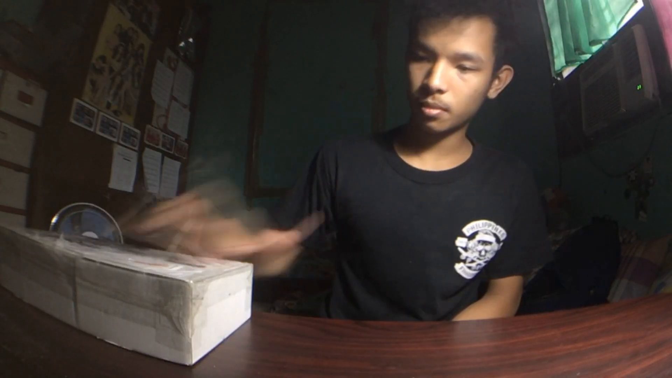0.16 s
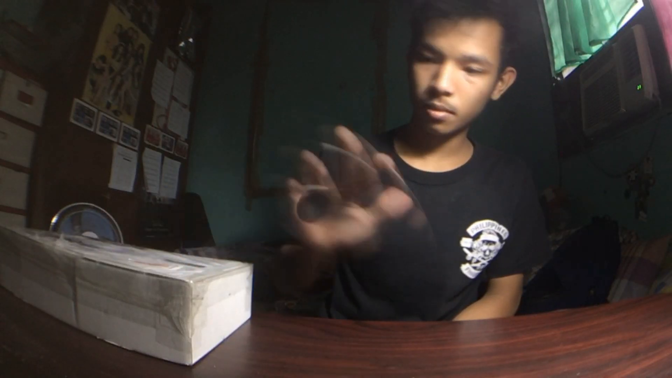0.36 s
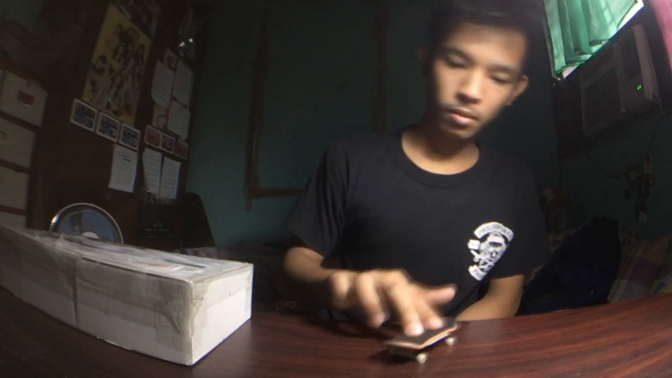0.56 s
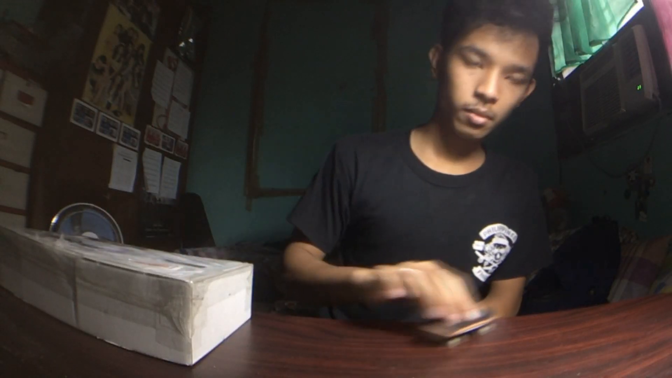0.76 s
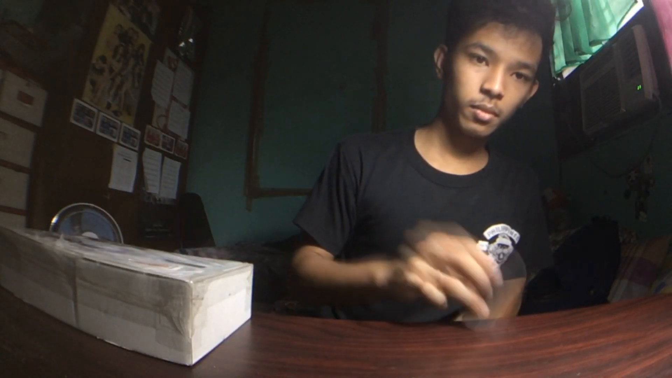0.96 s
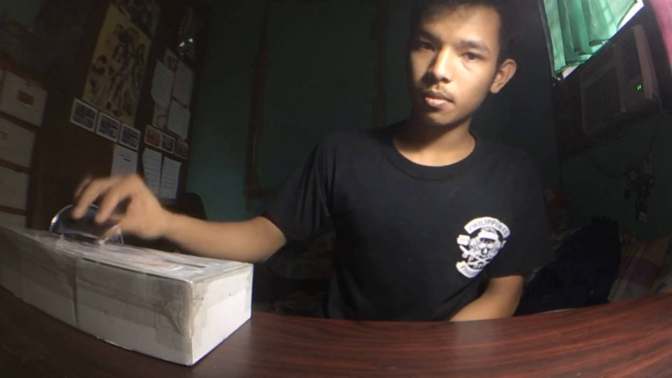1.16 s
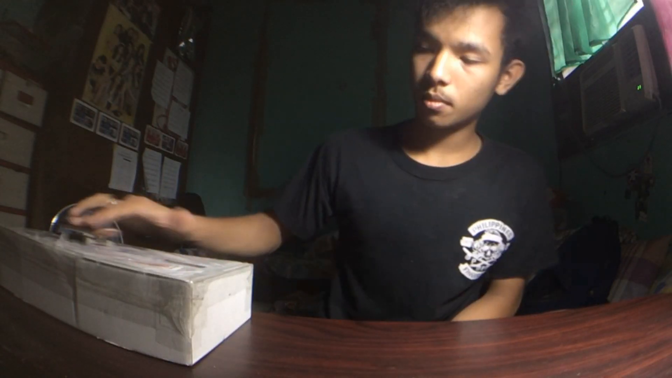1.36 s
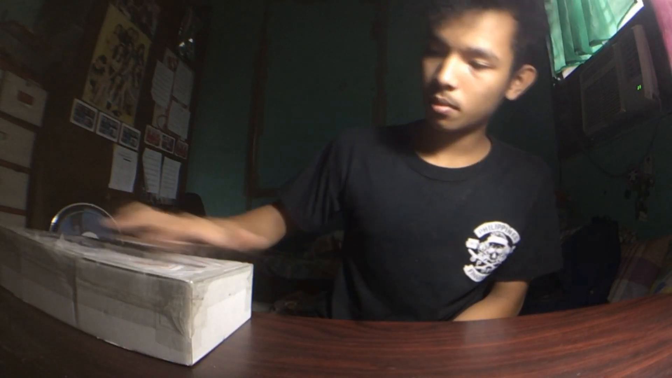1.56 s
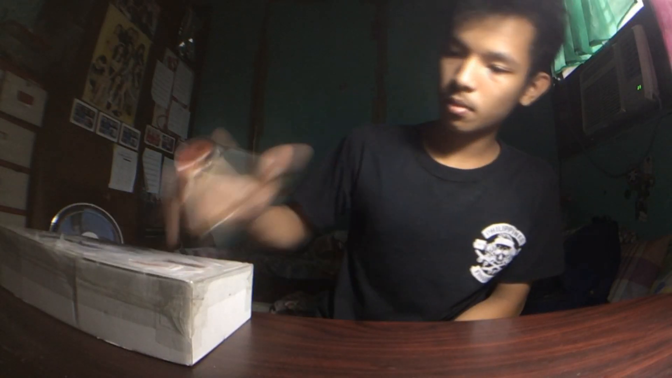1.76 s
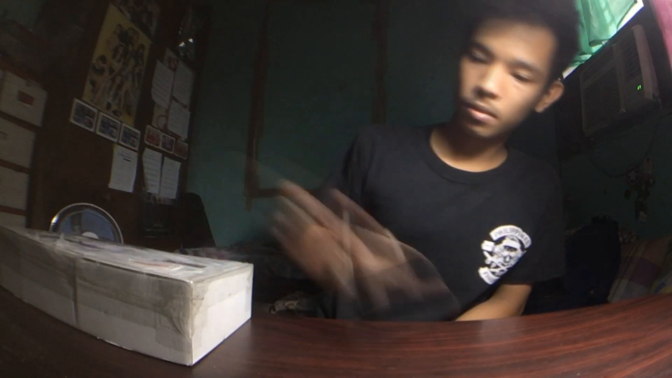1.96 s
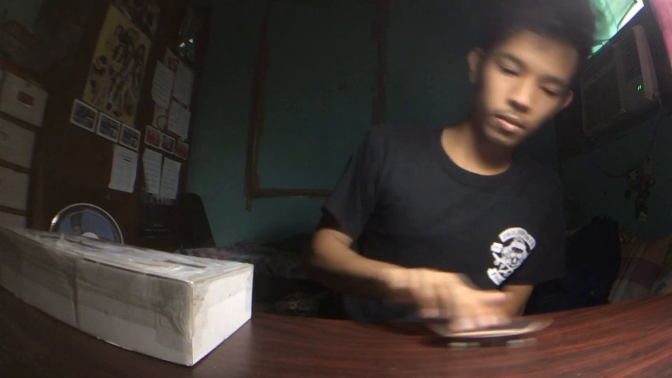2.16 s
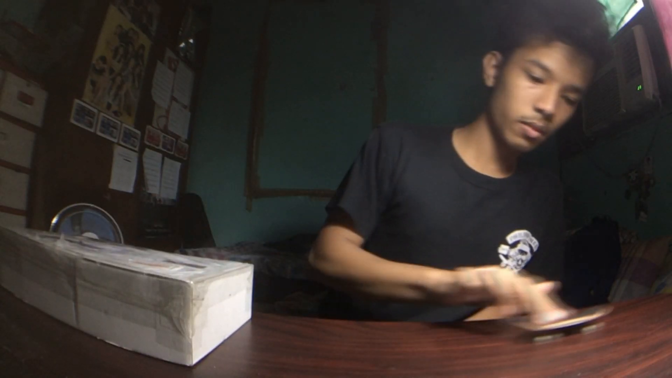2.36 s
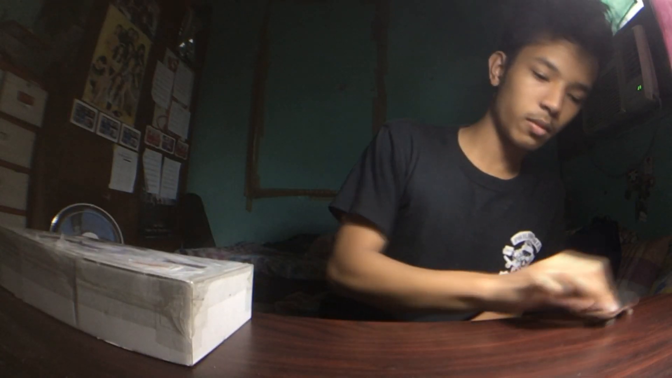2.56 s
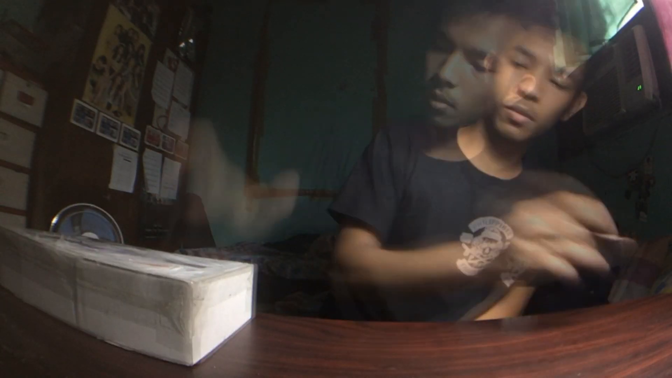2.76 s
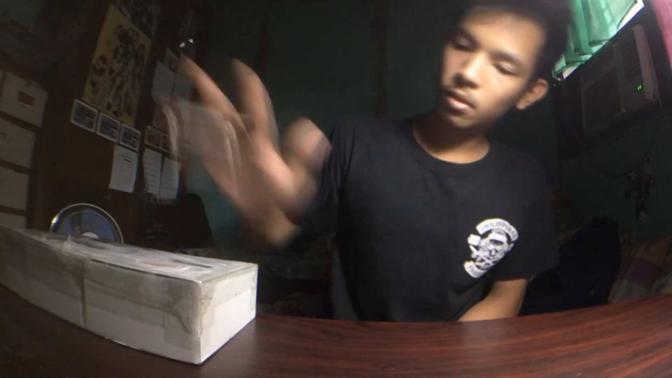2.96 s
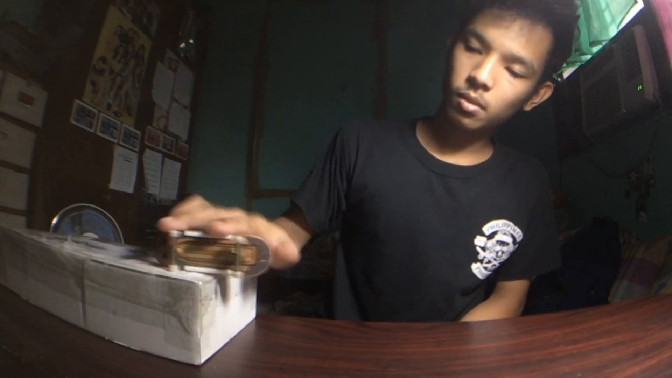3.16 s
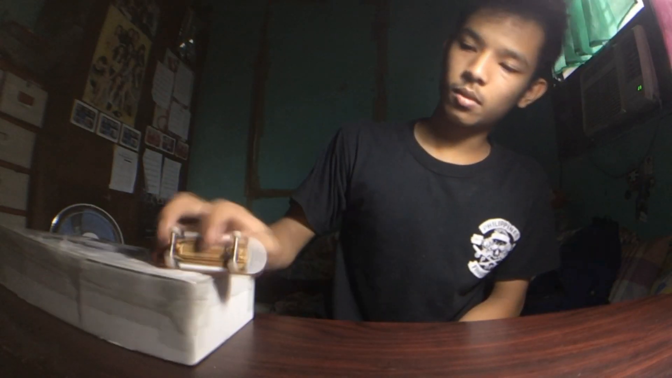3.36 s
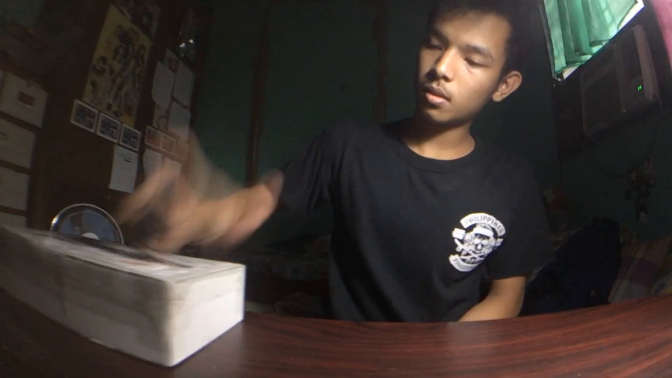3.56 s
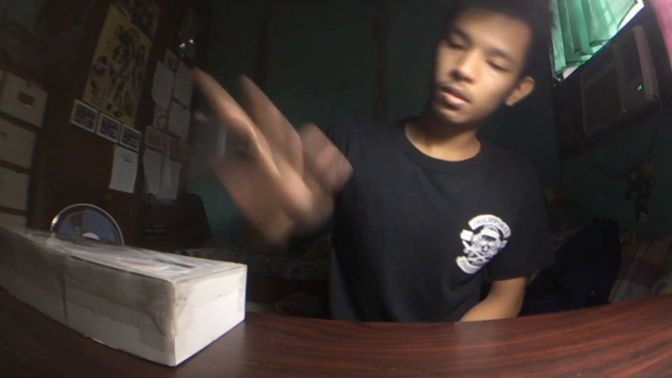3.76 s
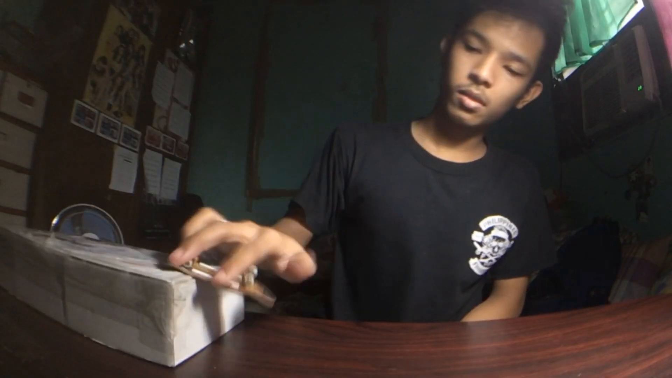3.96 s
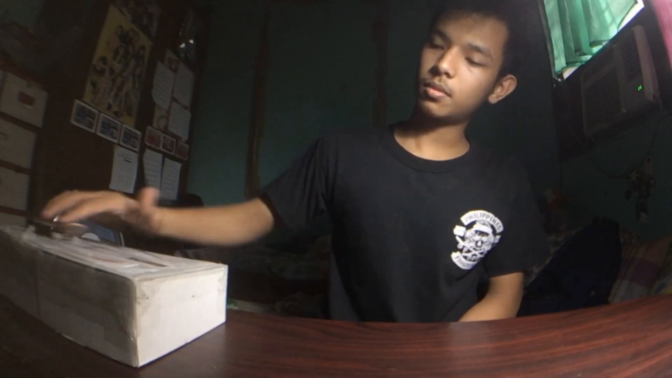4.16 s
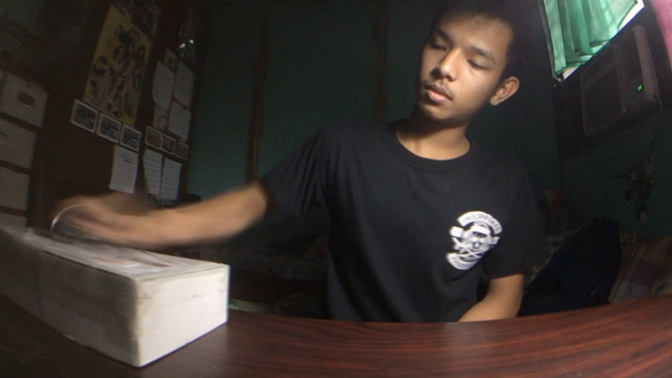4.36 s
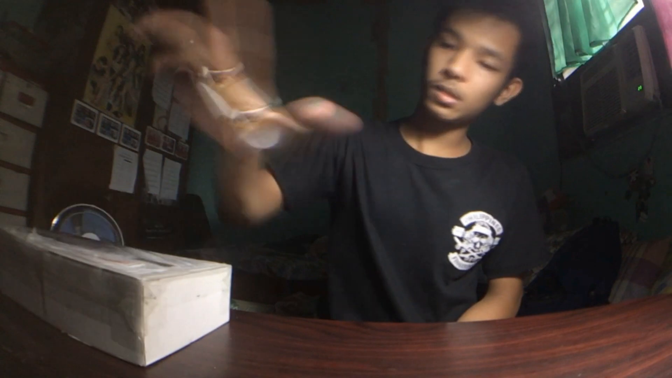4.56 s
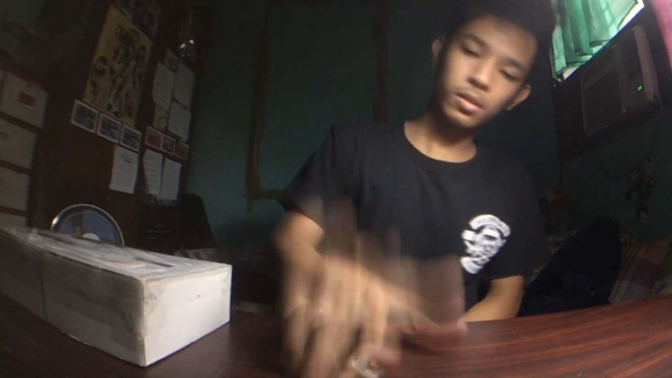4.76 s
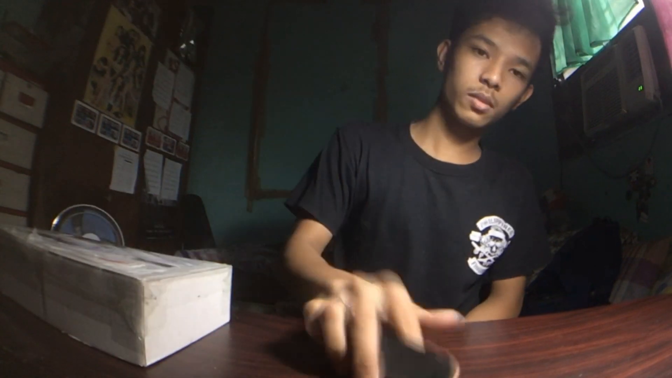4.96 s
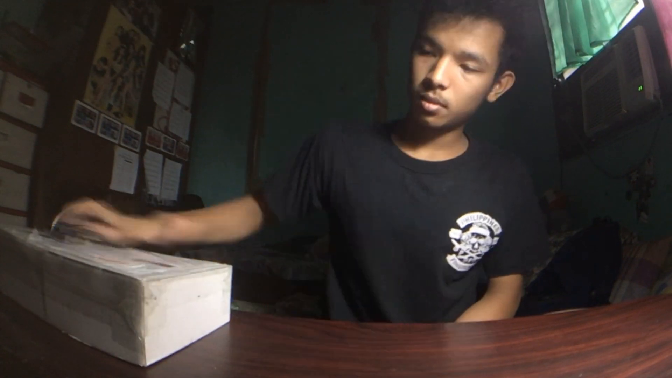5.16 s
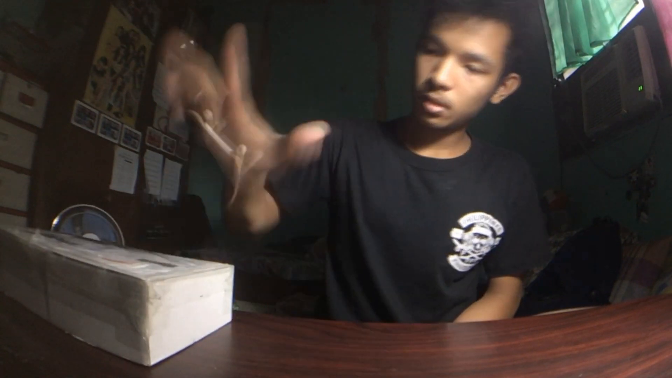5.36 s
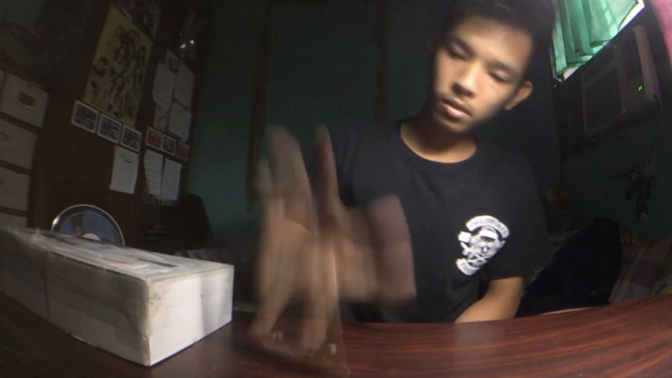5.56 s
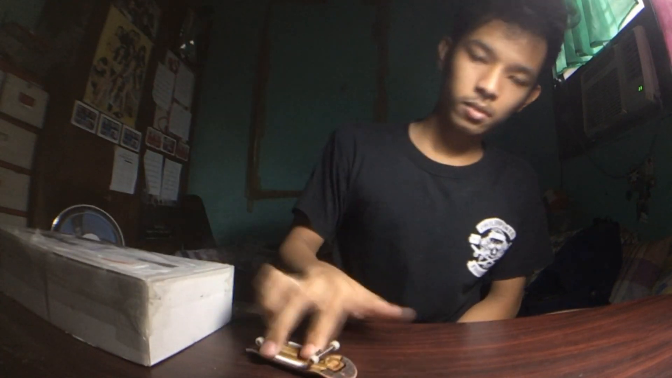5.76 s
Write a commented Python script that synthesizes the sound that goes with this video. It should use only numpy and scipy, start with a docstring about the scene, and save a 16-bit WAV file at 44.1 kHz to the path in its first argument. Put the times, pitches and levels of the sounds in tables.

```python
"""A fan hums in rushing air, then a miniature skateboard whirrs along a box and cracks onto a wooden desk.
Landings and taps excite damped resonances of metal, deck and desk, and each leaves a diffuse room tail.
Rolling is uneven noise jolting the same kinds of resonance; spinning wheels and a squeak are wavering tones.
The fan is a line in narrow noise, the air is shaped noise, and a far engine, heard in two passages, is a
harmonic series. A limiter holds the landings, and the level dips briefly three times."""
import sys
import numpy as np
from scipy import signal
from scipy.fft import rfft, irfft, next_fast_len
from scipy.io import wavfile
from scipy.ndimage import uniform_filter1d, minimum_filter1d, map_coordinates

SR = 44100
rng = np.random.default_rng(int(sys.argv[2]) if len(sys.argv) > 2 else 0)


def ratio(d):
    """dB to gain"""
    e = np.asarray(d, float) / 20
    return 10 ** e


def log_audio(samples):
    """Write samples as a 16-bit WAV file to the path given in sys.argv[1]."""
    # one column per channel
    frames = np.atleast_2d(samples).T
    # limit to full scale, then quantise
    limited = np.clip(frames, -1, 1)
    pcm = np.round(limited * 32767).astype(np.int16)
    wavfile.write(sys.argv[1], SR, pcm)


N = 255780  # samples

# Hard landings of one axle on the desk: start_s, axle_crack_db, wheel_crack_db, wood_db, change_per_skip_db
LANDINGS = [(0.5847, 5.5, 1, 0, 0), (0.6084, 2, -2, -9, 0), (2.1324, -1.5, -22.5, 2, -9.5),
            (2.158, 2, -3.5, -3.5, -1.5), (4.9006, 6, -10, 3.5, 0.5), (5.726, 1, -31.5, 2.5, -10.5)]
# Skips within every landing: delay_s, metal_db, wood_db
SKIPS = [(0, 1, -4), (.0033, -3, 1.5), (.0065, -6, -2), (.013, -8, 1.5)]
# Single taps and knocks: start_s, axle_crack_db, wheel_crack_db, deck_knock_db, desk_body_db
TAPS = [(0.3004, -28, -30, -15.5, -13), (0.616, -20, -25, -13, -4), (1.0833, -17.5, -23.5, -21, -35),
        (1.269, -45, -46, -17.5, -24.5), (1.287, -49, -52, -22, -24), (1.3576, -35, -52, -13.5, -27),
        (1.3678, -30.5, -59, -17.5, -22.5), (1.8435, -16.5, -27, -8.5, -7.5), (2.18, -13, -35, -20, -31),
        (2.704, -28, -34, -39, -38), (2.765, -31.5, -54, -33, -37), (2.91, -57, -44.5, -38, -32),
        (3.19, -12.5, -14.5, -5.5, -9.5), (3.208, -40, -31, -29, -22), (3.2187, -30, -31, -7.5, -9),
        (3.436, -59, -42.5, -51, -34), (3.9625, -15.5, -25, -7, -10.5), (3.98, -30, -48, -40, -16.5),
        (4.02, -21, -26, -41, -32), (4.03, -25, -40, -8.5, -15.5), (4.047, -39, -45, -34, -19.5),
        (4.093, -54, -37.5, -53, -45), (4.9224, -17, -9, -1, -5), (4.972, -16, -29, -18, -17.5),
        (5.704, -33, -56, -31, -38), (5.746, -33, -45, -23, -12)]
# Ticking of a flaw on a wheel: first_s, until_s, axle_crack_db
TICKING = [(0.821, .95, -41.5), (2.413, 2.69, -31.5)]
# Resonances of the axles: pitch_hz, width_hz, level_db
AXLE_MODES = [(2450, 1000, 0), (3650, 900, 0), (4600, 1100, -3)]
# Resonances of the hard wheels and bearings: pitch_hz, width_hz, level_db
WHEEL_MODES = [(5500, 800, -3), (6300, 1100, 0), (7500, 1200, -5), (9700, 2200, -6), (12500, 3000, -16)]
# Resonances of the board: pitch_hz, width_hz, level_db
DECK_MODES = [(644, 120, 1), (846, 60, 2), (1006, 114, 2.5), (1221, 137, 3.5), (1350, 570, -4),
              (1773, 410, -6), (2070, 400, -14.5)]
# Resonances of the desk top: pitch_hz, width_hz, level_db
DESK_MODES = [(160, 78, -5.5), (203.6, 24, 1), (252.4, 18.2, 3.5), (336.8, 28, -2.5), (470, 74, -10.5),
              (238, 280, -11)]
# Resonances of the desk frame: pitch_hz, width_hz, level_db
FRAME_MODES = [(71, 22, -2), (119, 23, 0.5)]
# Resonances of the box: pitch_hz, width_hz, level_db
BOX_MODES = [(574, 243, -8), (870, 128, -5.5), (1050, 156, 1), (1310, 548, -5.5), (1640, 272, -6)]
# Strokes on the desk, rolling wheels and at last a finger scraping: start_s, loudest_s, end_s, rumble_db,
# rattle_db
DESK_STROKES = [(.62, .7, .78, -46, -52), (0.792, 0.846, 0.867, -33.5, -50), (0.835, 0.93, 1.08, -38, -48),
                (2.19, 2.24, 2.37, -42, -50), (2.303, 2.505, 2.707, -35, -49),
                (2.637, 2.706, 2.74, -37.5, -43)]
# Rolling strokes on the box: start_s, loudest_s, end_s, rumble_db, desk_shake_db
# (the row whose end precedes its start stays silent)
BOX_STROKES = [(0.21, 0.275, .31, -24, -35), (1.552, 1.686, 1.797, -32.5, -33.5),
               (1.82, 1.844, 1.805, -17, -38), (3.415, 3.517, 4, -53, -42.5),
               (3.585, 3.622, 3.64, -30.5, -62), (3.601, 3.653, 3.72, -24.5, -33),
               (4.434, 4.509, 4.575, -23.5, -27.5), (5.117, 5.253, 5.27, -40.5, -35.5),
               (5.275, 5.351, 5.42, -20.5, -32)]
# Spectrum of the axle rattle: frequency_hz, density_db (dB per Hz, relative)
RATTLE_SPECTRUM = [(1500, -17), (2200, -15), (2600, 7), (3000, -6), (3850, -3), (5200, -14), (5950, -4.5),
                   (7000, -13.5), (10000, -19.5), (12000, -41), (16000, -55)]
# Wheels spun up under each push: start_s, climb_s, fade_s, top_turn_rate_hz, loudest_db
SPINS = [(0.242, .026, 0.1, 405, -23), (3.616, 0.045, 0.061, 397.7, -18.5),
         (4.472, 0.053, 0.058, 500.6, -17.5), (5.305, 0.059, 0.043, 479, -14.5)]
# Squeak of a bearing: time_s, pitch_hz, level_db
SQUEAK = [(2.31, 7880, -74), (2.335, 7880, -65), (2.4, 7850, -61), (2.48, 7750, -70)]
# Decay of the room: frequency_hz, t60_s
ROOM_DECAY = [(100, 0.17), (500, 0.13), (2500, 0.21), (8000, 0.21), (15000, 0.085)]
# Course of the fan hum: time_s, level_db
FAN_LEVEL = [(0, -38.5), (.64, -40), (1.7, -40.5), (2.3, -38.5), (3.16, -36), (3.49, -38.5), (3.75, -46),
             (3.96, -53), (4.15, -36.5), (4.73, -32.5), (4.94, -36.5), (5.56, -40.5), (5.7, -49),
             (5.8, -44)]
# Course of the low rush of air: time_s, level_db
AIR_LEVEL = [(0, -39), (.5, -42), (1.1, -38), (1.9, -43), (2.8, -42.5), (3.1, -40.5), (3.55, -43),
             (4.3, -36.5), (4.85, -34.5), (5.05, -42), (5.2, -34.5), (5.8, -37)]
# Spectrum of the low rush: frequency_hz, density_db (dB per Hz, relative)
RUSH_SPECTRUM = [(13, -45.5), (22, -31.5), (59, 1), (87, -16.5), (239, -8), (301, -12), (334, -14),
                 (578, -14.5), (780, -28), (1500, -27.5), (1950, -57), (3300, -120)]
# Spectrum of the hiss: frequency_hz, density_db (dB per Hz, relative)
HISS_SPECTRUM = [(470, -6.5), (800, -3), (1060, 0), (1260, -11), (1610, -7), (2870, -15), (4420, -18.5),
                 (9450, -31), (12500, -41), (16500, -35.5)]
# Two passages of a far engine, first near 65 Hz and then near 58 Hz: time_s, firing_rate_hz, level_db
ENGINE_PASSAGES = [(4.3, 66.43, -64), (4.55, 66, -43), (4.88, 65, -37), (5.0, 64.3, -59), (5.3, 60.6, -63),
                   (5.42, 58.87, -37.5), (5.55, 58.14, -29.5), (5.8, 57.1, -42)]
# Engine harmonics: multiple of the firing rate, level_db
ENGINE_ORDERS = [(2, -10), (3, -7), (4, 0), (6, -11), (10, -17)]
# Microphone response: frequency_hz, level_db
MICROPHONE = [(20, -12.5), (45, 0.5), (12000, -2.5), (15000, -6.5), (16500, -23)]
# Brief dips in level: centre_s, length_s (between half-depth points), depth_db
# (a dip shorter than its edges stays shallower)
DIPS = [(1.228, 0.0072, -14), (3.582, 0.031, -52), (5.232, 0.0053, -16)]


def unit(x):
    """Normalise the mean power: scale to rms 1."""
    return x / np.sqrt(np.mean(x ** 2) + 1e-20)


def peak(x):
    """Normalise the greatest excursion to 1."""
    return x / np.abs(x).max()


def along(points, hz):
    """Interpolate (Hz, value) points on a logarithmic frequency axis."""
    f, v = np.transpose(points)
    return np.interp(np.log(hz + 1), np.log(f + 1), v)


def curves(rows, outside=None):
    """Interpolate in time: one value per sample for each column after the time."""
    s, *columns = np.transpose(rows)
    return [np.interp(np.arange(N) / SR, s, c, outside, outside) for c in columns]


def wobble(rate):
    """Slow random modulation: a smooth curve through rate random knots a second."""
    knots = rng.standard_normal(int(N * rate / SR) + 4)
    return map_coordinates(knots, [np.arange(N) * rate / SR])


def filtered(x, response):
    """Linear filtering: multiply the spectrum by a complex response of frequency."""
    m = next_fast_len(len(x) + 8192)
    return irfft(rfft(x, m) * response(np.fft.rfftfreq(m, 1 / SR)), m)[:len(x)]


def softened(x, corner_hz):
    """Contact compliance: two equal first-order low-passes remove the treble."""
    return filtered(x, lambda f: 1 / (1 + 1j * f / corner_hz) ** 2)


def resonant(x, modes, scatter_db=0):
    """Modal superposition: damped resonances of alternating sign, each excited a little differently."""
    sizes = ratio(scatter_db * rng.standard_normal(len(modes)))

    def response(f):
        total = 0
        for k, (centre, width, db) in enumerate(modes):
            damping = 1j * f * width
            total = total + (-1) ** k * sizes[k] * ratio(db) * damping / (centre ** 2 - f ** 2 + damping)
        return total

    return filtered(x, response)


def room(x):
    """Diffuse reverberation: a fresh delayed noise tail in which each frequency has its own decay time."""
    hz, t, z = signal.stft(rng.standard_normal(SR // 3), SR, nperseg=256)
    decay = ratio(-60 * t / along(ROOM_DECAY, hz)[:, None])
    tail = signal.istft(z * decay, SR, nperseg=256)[1]
    delayed = np.pad(x, (220, 0))
    return signal.fftconvolve(delayed, tail / np.linalg.norm(tail))[:len(x)]


def landing_skips():
    """Repeated impact: every landing skips, and the wood feels part of the level change per skip."""
    rows = []
    for s, axle, wheel, wood, change in LANDINGS:
        for k, (delay, metal_db, wood_db) in enumerate(SKIPS):
            metal_change = metal_db + k * change
            deck = wood + wood_db + 0.51 * k * change
            desk = deck - 9
            rows.append((s + delay, axle + metal_change, wheel + metal_change, deck, desk))
    return rows


def wheel_ticks():
    """Periodic impact: a flaw on a wheel strikes once a turn with scattered strength."""
    rows = []
    for first, until, db in TICKING:
        for s in np.arange(first, until, 0.0533):  # s per turn
            mean_db = db + np.array([0, -22, 7, -7])  # axle, wheel, deck, desk
            rows.append((s, *(mean_db + 2.5 * rng.standard_normal(4))))
    return rows


def push(t, time_s, lag_s):
    """Contact force: a delayed pulse that rises and dies over about time_s."""
    late = t - lag_s
    return np.maximum(late, 0) / time_s * np.exp(-late / time_s)


def metal(axle_drive, wheel_drive, axle_db, wheel_db):
    """Modal response of the metal parts: wheels and axles crack with opposite sign."""
    wheels = ratio(wheel_db) * peak(resonant(wheel_drive, WHEEL_MODES, scatter_db=4))
    axles = ratio(axle_db) * peak(resonant(axle_drive, AXLE_MODES, scatter_db=1.5))
    return wheels - axles


def wood(t, deck_db, desk_db):
    """Delayed modal response: slower force pulses reach the deck, desk top and frame."""
    deck = ratio(deck_db) * peak(resonant(push(t, 0.00008, 0.00073), DECK_MODES, scatter_db=6))
    desk = ratio(desk_db) * peak(resonant(push(t, 0.00026, 0.00056), DESK_MODES, scatter_db=5))
    frame = ratio(desk_db - 9.5) * peak(resonant(push(t, 0.001, 0.003), FRAME_MODES, scatter_db=5))
    return deck + desk + frame


def hits():
    """Impact excitation: contacts chatter in the metal, the wood answers a moment later, the room follows."""
    out, t = np.zeros(N + SR), np.arange(SR // 3) / SR
    impulse = (t == 0).astype(float)
    for s, axle_db, wheel_db, deck_db, desk_db in [*TAPS, *landing_skips(), *wheel_ticks()]:
        chatter = ratio(-60 * t / 0.014) * rng.standard_normal((2, len(t)))  # dies by 60 dB in 14 ms
        reach_hz = 22000 * ratio(0.3 * axle_db)  # lighter contacts are softer
        direct_metal = metal(softened(chatter[0], reach_hz), chatter[1], axle_db, wheel_db)
        # summed over all directions the chatter has an even colour
        all_round_metal = metal(impulse, impulse, axle_db, wheel_db)
        knock = wood(t, deck_db, desk_db)
        reverberant = ratio(-9.5) * room(all_round_metal + knock)
        out[round(s * SR):][:len(t)] += direct_metal + knock + reverberant
    return out[:N]


def stroke(start, top, end, edge_db, rounding):
    """Level envelope: dB below the top of a stroke that swells and fades, inaudible outside."""
    far = curves([(start, 1), (top, 0), (end, 1)], 3)[0]
    return edge_db * far ** rounding


def desk_stroke(start, top, end, rumble_db, rattle_db):
    """Common envelope: rumble, rattle and shake swell together."""
    below = stroke(start, top, end, edge_db=-23.5, rounding=2.54)
    return [rumble_db + below, rattle_db + below, rumble_db - 11 + below]


def box_stroke(start, top, end, rumble_db, shake_db):
    """Unequal growth: rattle grows faster than rumble, and the desk shakes more evenly."""
    edge_db = -33
    below = stroke(start, top, end, edge_db, rounding=1.95)
    rumble = rumble_db + below
    rattle = -12 + 1.42 * rumble
    shake = np.where(below < edge_db, below, 0.38 * below)
    return [rumble, rattle, shake_db + shake]


def rolling(levels_db, surface, grit_db):
    """Roughness excitation: uneven small jolts ring the surface, rattle the axles and shake the desk."""
    unevenness = np.array([wobble(90), 1.6 * wobble(660), wobble(44)]) + 0.66 * wobble(20)
    jolts = rng.standard_normal((3, N)) * ratio(grit_db * unevenness)
    rumble = resonant(softened(jolts[0], 4000), surface)
    rattle = filtered(jolts[1], lambda f: ratio(along([(700, -60), *RATTLE_SPECTRUM], f)))
    shake = resonant(jolts[2], DESK_MODES)
    layers = [unit(rumble), unit(rattle), unit(shake)]
    gains = uniform_filter1d(sum(ratio(db) for db in levels_db), 300)
    return np.sum(gains * layers, axis=0)


def spin_up(s, climb, fade, top_hz, db):
    """Angular acceleration: the turn rate climbs and sags, the beat being loudest early in the climb."""
    first, last, attack = 0.38, 0.84, 0.25  # shares of the top rate, of the top rate, of the climb
    early = first + (1 - first) * attack
    return [(s, first * top_hz, db - 25.5), (s + attack * climb, early * top_hz, db),
            (s + climb, top_hz, db - 1), (s + climb + fade, last * top_hz, db - 29)]


def wavering_tone(rows, jitter, jitter_rate, flutter_db, overtone_db):
    """Frequency and amplitude modulation: an unsteady sine with its octave."""
    pitch_hz = curves(rows)[0]
    level_db = curves(rows, -120)[1]
    phase = 2 * np.pi * np.cumsum(pitch_hz * (1 + jitter * wobble(jitter_rate))) / SR
    tone = np.sin(phase) + ratio(overtone_db) * np.sin(2 * phase)
    return np.sqrt(2) * ratio(level_db + flutter_db * wobble(70)) * tone


def whirr():
    """Rotational imbalance: an off-centre wheel beats once a turn."""
    return sum(wavering_tone(spin_up(*row), jitter=0.04, jitter_rate=120, flutter_db=3.5, overtone_db=-20.5)
               for row in SPINS)


def squeak():
    """Bearing vibration: a high tone with rapid random frequency modulation."""
    return wavering_tone(SQUEAK, jitter=0.025, jitter_rate=700, flutter_db=4, overtone_db=-40)


def board():
    """Superposition: landings, rolling and spinning wheels, with the room's answer to the wheels."""
    wheels = rolling([desk_stroke(*row) for row in DESK_STROKES], DECK_MODES, grit_db=2.0)
    wheels += rolling([box_stroke(*row) for row in BOX_STROKES], BOX_MODES, grit_db=1.0)
    wheels += whirr() + squeak()
    return hits() + wheels + ratio(-11) * room(wheels)


def fan():
    """Narrow-band hum: a wavering line with a fringe of resonant noise."""
    line_hz = 58 * (1 + 0.014 * wobble(4.79))
    line = np.sqrt(2) * np.sin(2 * np.pi * np.cumsum(line_hz) / SR)
    narrow = resonant(rng.standard_normal(N), [(56.4, 8.6, 0)])
    fringe = unit(resonant(narrow, [(58.4, 21, 0)]))
    return ratio(curves(FAN_LEVEL)[0]) * (0.55 * ratio(1.3 * wobble(5.6)) * line + 0.39 * fringe)


def coloured_noise(spectrum):
    """Spectral shaping: white noise through a given density curve, at rms 1."""
    return unit(filtered(rng.standard_normal(N), lambda f: ratio(along(spectrum, f))))


def air():
    """Broadband noise: room rush and hiss swell a little, the hiss less than the rush."""
    rush_db = curves(AIR_LEVEL)[0]
    hiss_db = -34 + 0.37 * rush_db
    rush = ratio(rush_db + 0.62 * wobble(9.1)) * coloured_noise(RUSH_SPECTRUM)
    hiss = ratio(hiss_db + 0.27 * wobble(3.78)) * coloured_noise(HISS_SPECTRUM)
    return rush + hiss


def engine():
    """Harmonic series: a far engine in two passages, near 65 and then near 58 firings a second."""
    firing_hz, level_db = curves(ENGINE_PASSAGES)
    phase = 2 * np.pi * np.cumsum(firing_hz * (1 + 0.0052 * wobble(15))) / SR
    orders = sum(ratio(db + 0.7 * wobble(9.0)) * np.sin(k * phase) for k, db in ENGINE_ORDERS)
    return ratio(level_db) * orders


def scene():
    """Superposition: everything that reaches the microphone, as one channel."""
    return (board() + fan() + air() + engine())[None]


def limited(x):
    """Gain reduction: a brief hold plus a slow recovery keep down the peaks."""
    top, hold_s, release_s, slow_weight = 1.37, 0.012, 0.23, 5
    needed_db = 20 * np.log10(np.minimum(1, top / (np.abs(x[0]) + 1e-9)))
    span = int(hold_s * SR)
    fast_db = uniform_filter1d(minimum_filter1d(needed_db, 2 * span), span)
    keep = np.exp(-1 / (release_s * SR))
    slow_db = signal.lfilter([1 - keep], [1, -keep], fast_db)  # gain lost in a burst returns slowly
    return x * ratio(fast_db + slow_weight * slow_db)


def level_dips(x):
    """Amplitude modulation: the level dips briefly, with edges linear in dB."""
    t, edge_s = np.arange(N) / SR, 0.0071
    for s, length, depth_db in DIPS:
        inside = np.clip((length / 2 - np.abs(t - s)) / edge_s + 0.5, 0, 1)
        x = x * ratio(depth_db * inside)
    return x


def top_cut(x):
    """Nothing passes above the cut-off."""
    return signal.sosfilt(signal.butter(12, 16830, fs=SR, output="sos"), x)


def record(dry):
    """Transduction: microphone colour, limiter, soft saturation and the brief dips in level."""
    picked_up = filtered(dry[0], lambda f: ratio(along(MICROPHONE, f)))[None]
    held = limited(picked_up)
    clipped = held / (1 + np.abs(held) ** 8) ** (1 / 8)
    mix = level_dips(clipped)
    return top_cut(mix)


dry = scene()
out = record(dry)
log_audio(out)
```